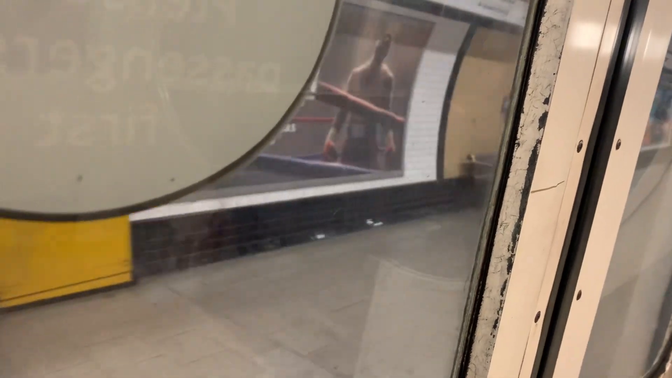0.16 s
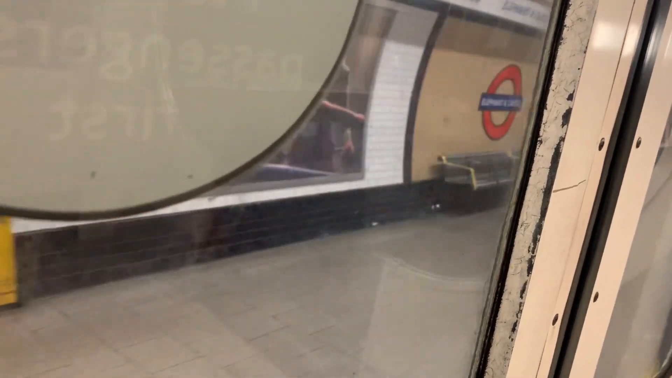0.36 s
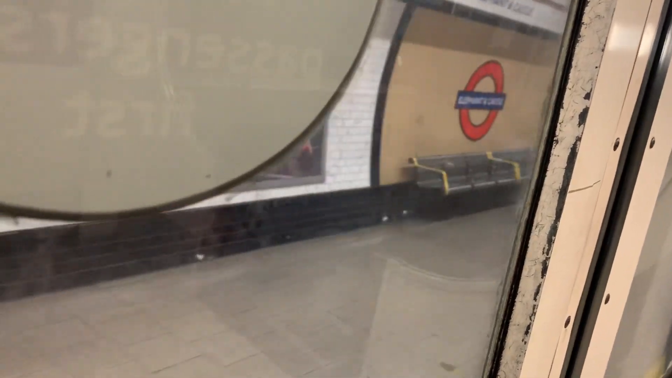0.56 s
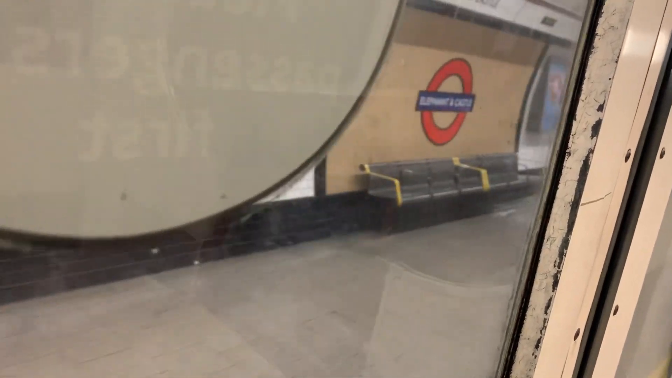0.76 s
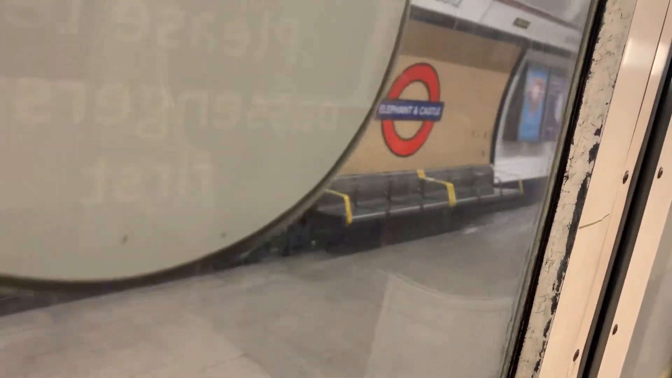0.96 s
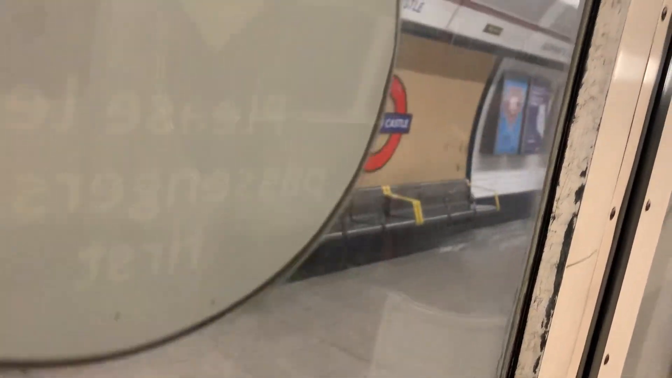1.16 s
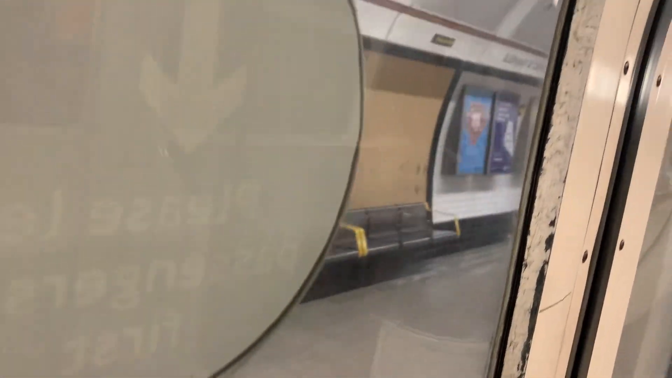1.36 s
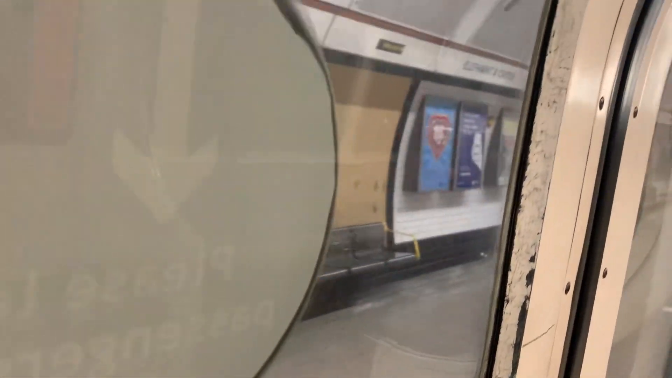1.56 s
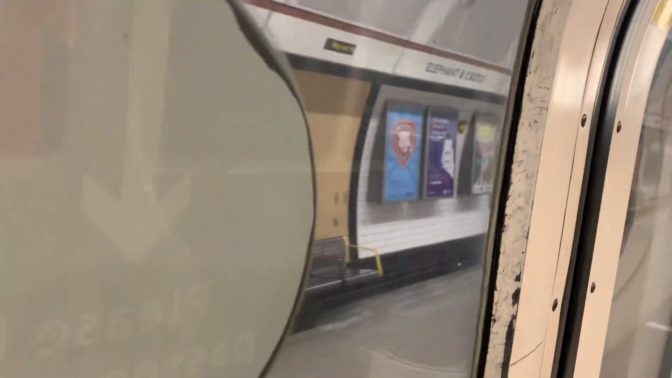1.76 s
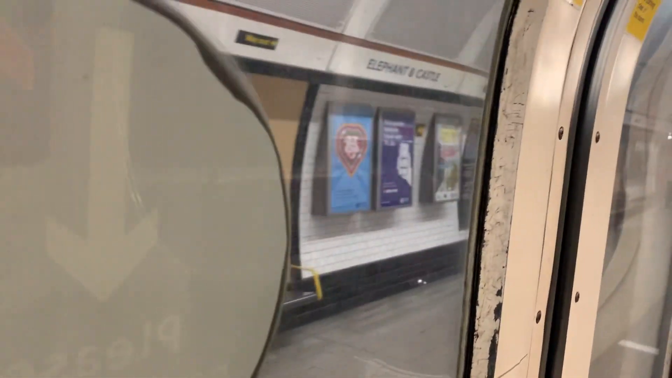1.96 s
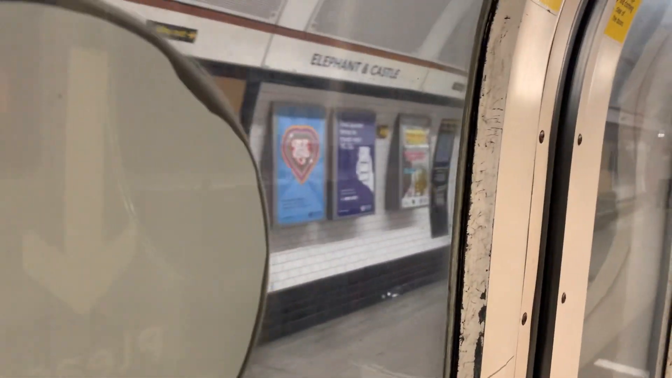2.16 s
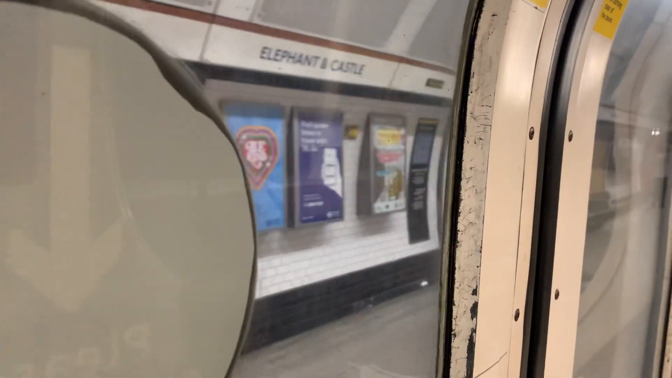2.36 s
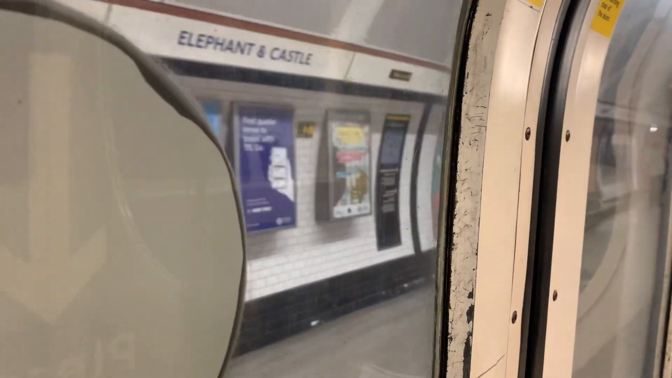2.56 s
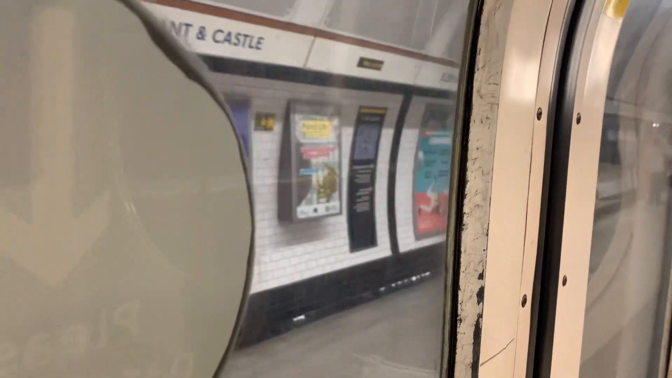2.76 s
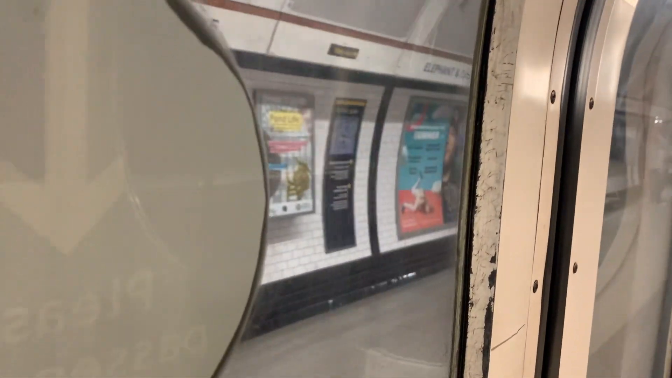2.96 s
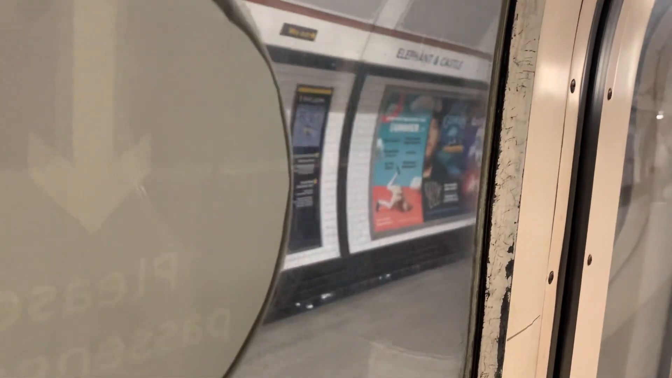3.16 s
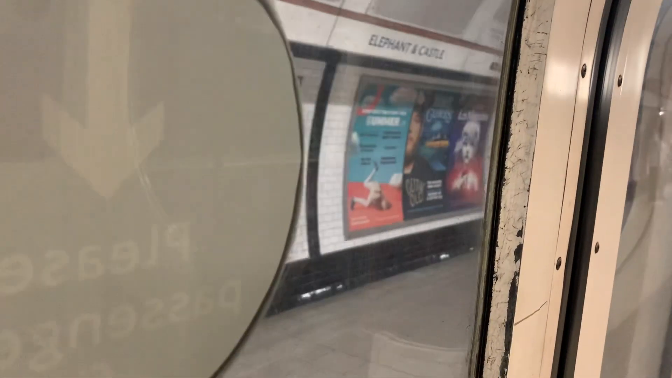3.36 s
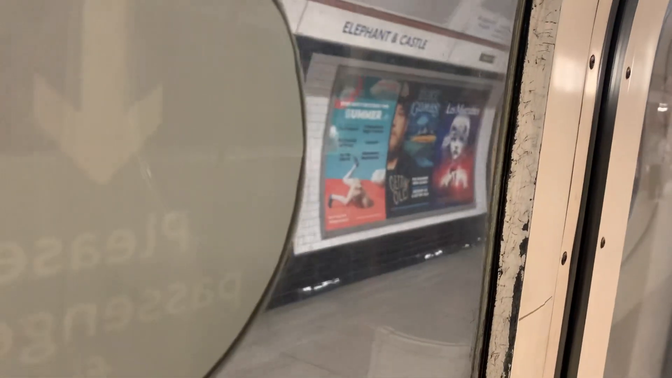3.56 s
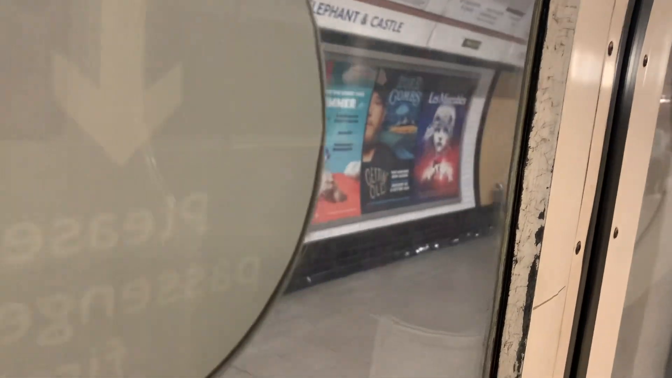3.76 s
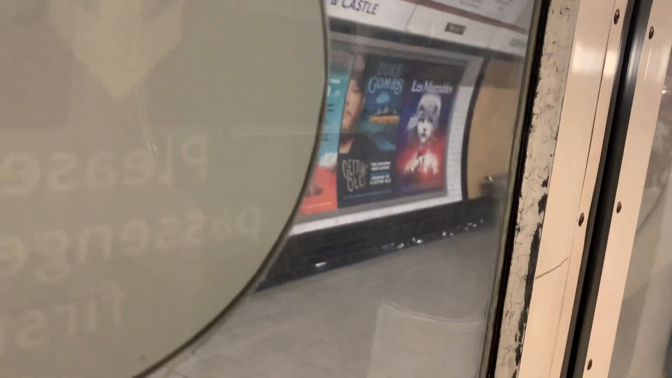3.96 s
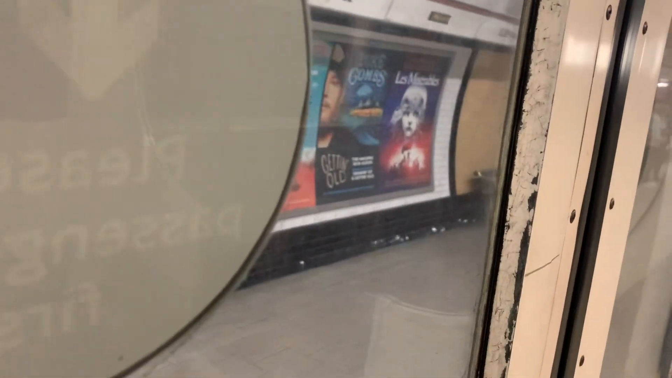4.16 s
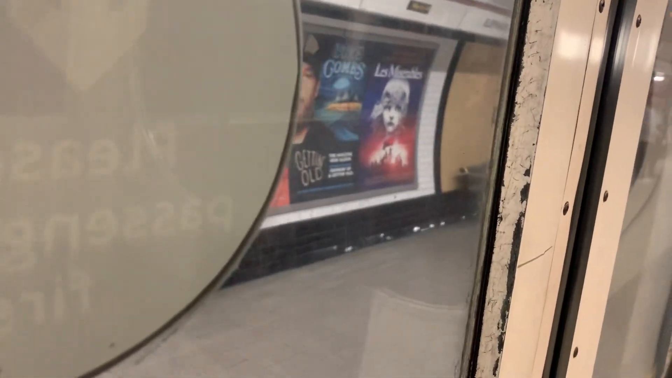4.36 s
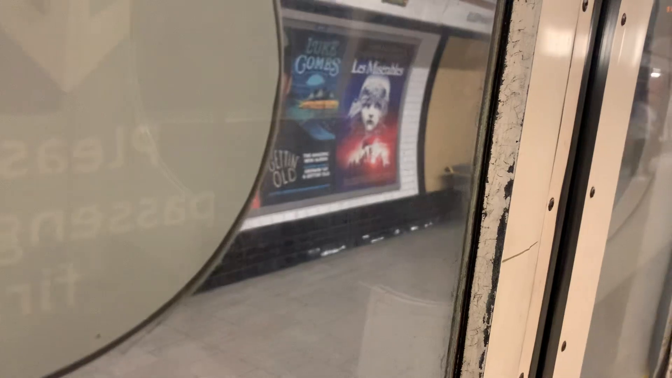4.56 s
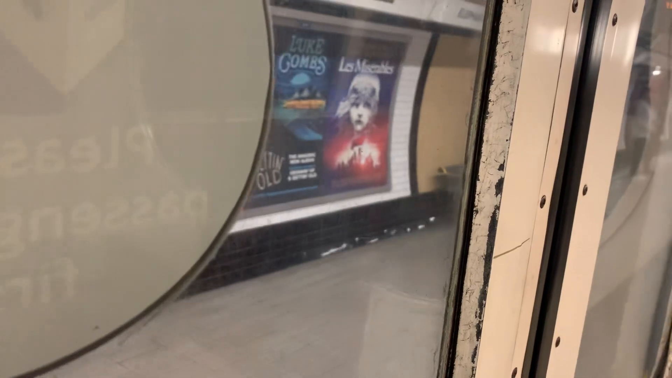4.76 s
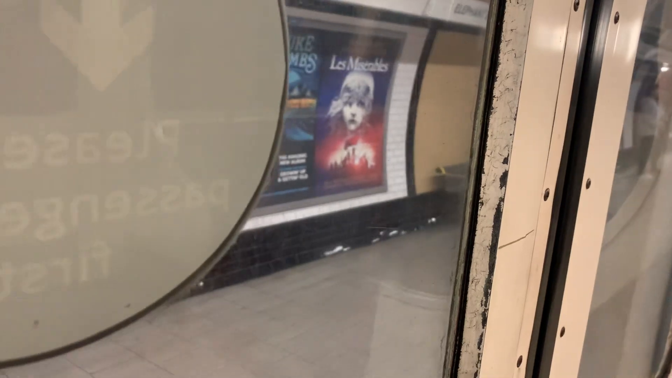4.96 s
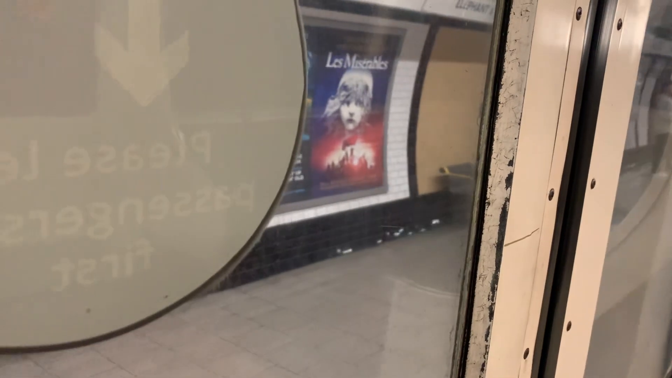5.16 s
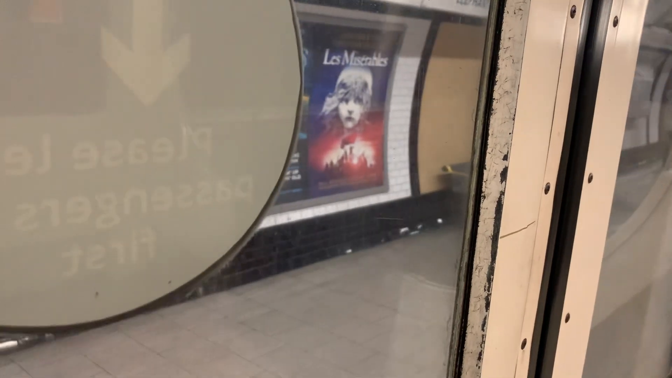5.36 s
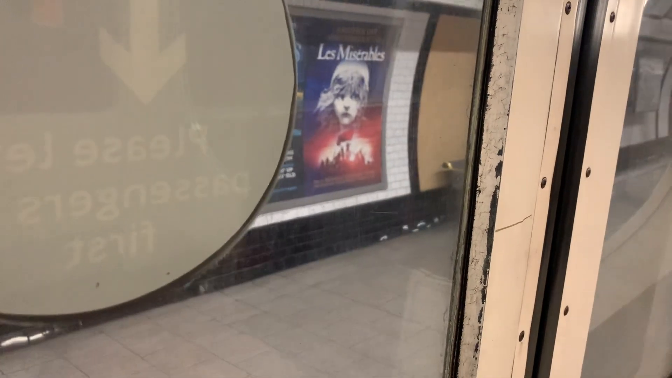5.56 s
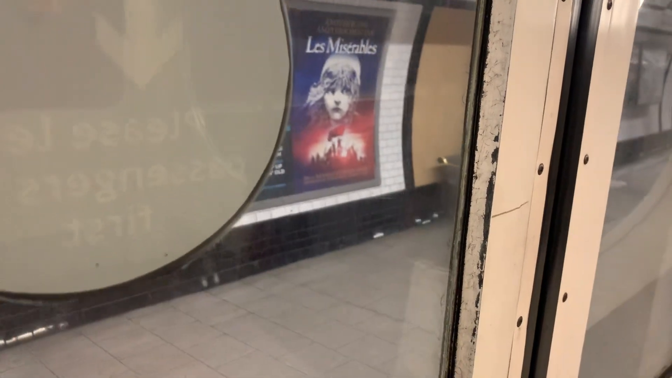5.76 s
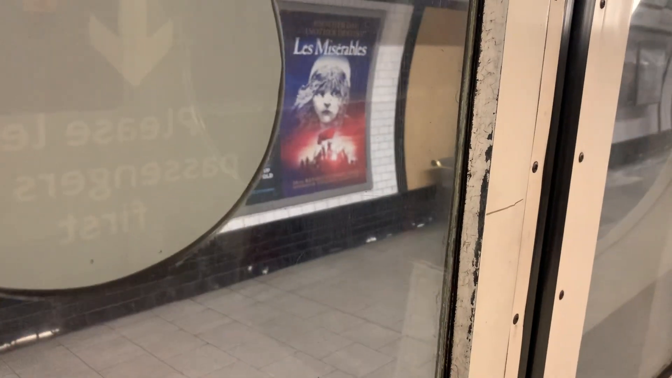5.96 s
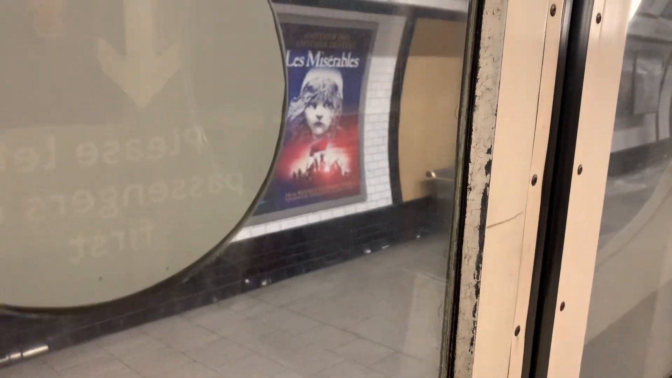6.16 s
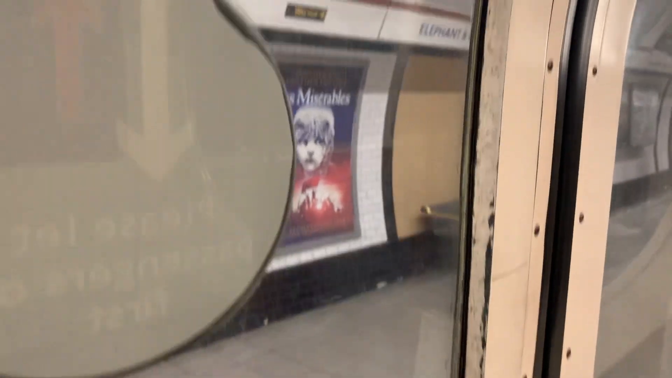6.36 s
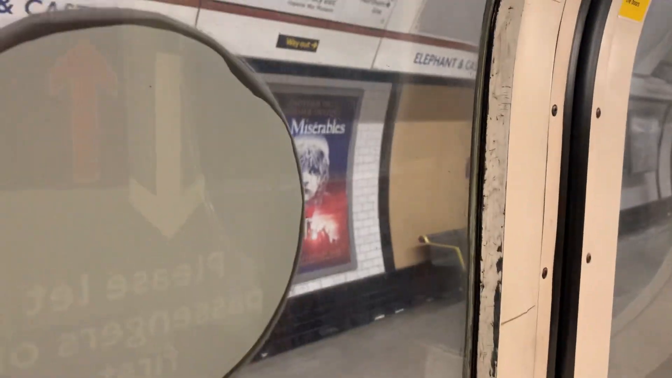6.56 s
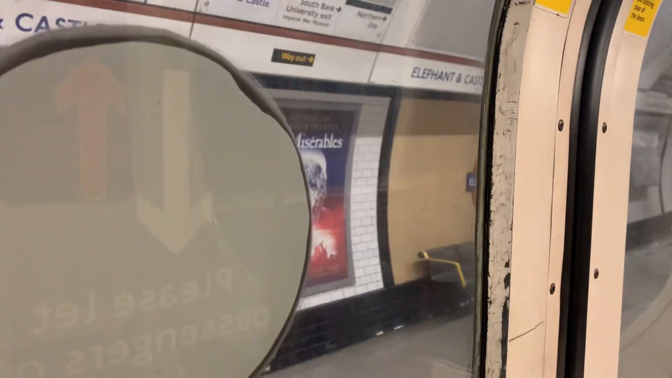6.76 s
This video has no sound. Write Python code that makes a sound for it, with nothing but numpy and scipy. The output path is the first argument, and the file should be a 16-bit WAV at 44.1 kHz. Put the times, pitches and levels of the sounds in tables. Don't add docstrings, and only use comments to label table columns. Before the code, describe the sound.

Heavy low drumming of a slowing underground train, heard from inside, with rail-joint thuds and air hiss fading to steady ventilation and a small puff.

```python
import sys
import numpy as np
from scipy import signal
from scipy.fft import rfft, irfft, next_fast_len
from scipy.io import wavfile
from scipy.ndimage import uniform_filter1d, map_coordinates

SR = 44100
rng = np.random.default_rng(int(sys.argv[2]) if len(sys.argv) > 2 else 0)


def ratio(d):
    e = np.asarray(d, float) / 20
    return 10 ** e


def master_out(mix):
    frames = np.transpose(np.atleast_2d(mix))
    ceiling = np.clip(frames, -1, 1)
    pcm = np.round(ceiling * 32767).astype(np.int16)
    wavfile.write(sys.argv[1], SR, pcm)


N = 300314
TIME_S = np.arange(N) / SR
DIRECT_ONLY = [[1], [0]]


def unit(x):
    return x / np.sqrt(np.mean(x ** 2) + 1e-20)


def along(points, hz):
    f, *cols = np.transpose(points)
    return [np.interp(np.log(hz + 1), np.log(f + 1), c) for c in cols]


def curves(rows):
    s, *cols = np.transpose(rows)
    return [np.interp(TIME_S, s, c) for c in cols]


def wobble(rate_hz):
    knots = rng.standard_normal(int(N * rate_hz / SR) + 4)
    return map_coordinates(knots, [np.arange(N) * rate_hz / SR])


def filtered(x, response):
    m = next_fast_len(N + 8192)
    return irfft(rfft(x, m) * response(np.fft.rfftfreq(m, 1 / SR)), m)[..., :N]


def modes(table, hz):
    power = 0
    for centre, width, db in table:
        detuning = (centre * centre - hz * hz) ** 2
        power = power + ratio(2 * db) * (hz * width) ** 4 / (detuning + (hz * width) ** 2) ** 2
    return np.sqrt(power)


def colour(points):
    return lambda hz: ratio(along(points, hz)[0]) * (hz < points[-1][0])


def rush(gain, patchy_db):
    z = signal.stft(rng.standard_normal((2, N + 1024)), nperseg=1024)[2]
    field = uniform_filter1d(rng.standard_normal(z.shape[1:]), size=3, axis=0)
    field = uniform_filter1d(field, size=5, axis=1)
    pair = signal.istft(z * ratio(patchy_db * unit(field)), nperseg=1024)[1][:, :N]
    return unit(filtered(pair, gain))


def steadied(x, share, span_s):
    span = int(span_s * SR)
    power = uniform_filter1d(uniform_filter1d(x ** 2, span), span)
    return unit(x / (np.abs(power) + .02) ** (np.clip(share, 0, 1) / 2))


def swell(peak_s, rise_s, fall_s):
    age = TIME_S - peak_s
    return np.exp(-(age / np.where(age < 0, rise_s, fall_s)) ** 2)


def strokes(rows, rise_s):
    s, db, fall = np.transpose(rows)[:, :, None]
    t = np.arange(0, N, 64) / SR
    bells = db * np.exp(-((t - s) / np.where(t < s, rise_s, fall)) ** 2)
    return np.interp(TIME_S, t, np.max(bells, axis=0))


# time_s, level_db
ROLLING_FORCE = [(0, -14.5), (.45, -19), (.95, -15), (1.15, -12), (1.55, -17.5), (1.85, -14.5), (2.35, -23),
                 (2.47, -18), (2.6, -21), (2.85, -16.5), (3.3, -30.5), (3.65, -19.5), (4.15, -24),
                 (4.45, -33), (4.7, -22), (4.95, -33.5), (5.5, -35), (6.81, -36.5)]


def speed():
    force_db, = curves(ROLLING_FORCE)
    full_speed_db = -14.5
    return force_db, uniform_filter1d(force_db, int(0.99 * SR), mode="nearest") - full_speed_db


def wheels():
    return boom() + ring() + drone() + jolt() + rattle()


# peak_s, boost_db
THUMPS = [(0.042, -8), (.12, -6), (.25, 5.5), (0.382, 0.5), (.53, 2), (0.641, 4.5), (.76, 0.5), (.9, -1.5),
          (1.12, -4.5), (1.23, -2.5), (1.38, 1.5), (1.63, -1), (1.71, -3), (1.799, 8.5), (1.87, 3.5),
          (2.0, -1), (2.13, 5), (2.21, 6), (2.289, 6.5), (2.371, 8.5), (2.54, -2), (3.15, 7.5), (2.74, -16),
          (3.0, 6), (3.301, 11.5), (3.46, 11.5), (3.58, 3), (3.718, 1.5), (3.9, 3), (4.1, 2), (4.27, 3),
          (4.62, 1.5), (4.73, -1.5), (4.92, 7), (5.1, 1), (5.35, 2), (5.62, 5), (5.76, 7), (5.86, 9),
          (6.2, 5), (6.55, 5)]


def thump_boost():
    return strokes([(s, db, 0.026) for s, db in THUMPS], rise_s=0.029)


# pitch_hz, width_hz, level_db
SHELL_MODES = [(33, 20, -45.5), (52.7, 11, -22.5), (66.6, 12, -6.5), (83, 20, -10), (100.5, 16, -7.5)]


def boom():
    level_db = speed()[0] - 6 + 1.11 * thump_boost()
    return ratio(level_db) * steadied(rush(lambda hz: modes(SHELL_MODES, hz), 2.5), share=.92, span_s=0.062)


# time_s, pitch_hz, level_db
SWAY = [(0.0, 81.7, -17.5), (0.75, 86.7, -18.5), (0.87, 98.4, -18), (1.02, 99, -17.5), (1.08, 88.5, -17),
        (2.02, 83.2, -18), (2.07, 76, -17), (2.29, 83.14, -15), (2.58, 71.46, -22.5), (2.79, 71.7, -21.5),
        (3.21, 90.2, -25), (3.29, 81.8, -26.5), (3.53, 94.25, -23.5), (3.66, 85.0, -20),
        (4.18, 82.2, -26.5), (4.36, 88.9, -31.5), (4.75, 80.1, -25.5), (4.8, 76, -45.5)]


def ring():
    hz, db = curves(SWAY)
    hz = uniform_filter1d(hz, size=2000, mode="nearest") + 3 * wobble(9)
    level_db = db - 4.5 + 0.56 * thump_boost() + 3.5 * wobble(9)
    return -2 * np.cos(2 * np.pi * np.cumsum(hz) / SR) * ratio(level_db) * DIRECT_ONLY


# peak_s, boost_db, fall_s, floor_boost_db
JOINTS = [(0, 3, 0.021, -23.5), (.16, 4, 0.13, 3), (0.671, 4, 0.08, 4), (0.891, 0.5, 0.14, 4),
          (1.125, 10, 0.11, -1.5), (1.305, 4.5, 0.05, 3), (1.382, 5.5, 0.087, 2.5), (1.62, 2, 0.13, 5),
          (1.845, 8, 0.049, 3), (1.92, 6.5, 0.16, 3), (2.7, -2, 0.043, 3), (3.0, 0.5, 0.042, -1.5),
          (3.45, 3, 0.014, -2), (3.77, 2, .07, -2), (5.38, 3, 0.041, 14), (5.8, 2.5, 0.13, -8),
          (6.7, 3.5, 0.037, 14)]
JOINT_RISE_S = 0.031


def joint_boost():
    return strokes([(s, db, fall) for s, db, fall, _ in JOINTS], JOINT_RISE_S)


# pitch_hz, width_hz, level_db
FLOOR_PANELS = [(133.8, 33, 1.5), (172, 25, -5)]


def drone():
    floor_db = strokes([(s, db, fall) for s, _, fall, db in JOINTS], JOINT_RISE_S)
    level_db = -21 + speed()[1] + floor_db + 0.96 * wobble(12)
    return ratio(level_db) * steadied(rush(lambda hz: modes(FLOOR_PANELS, hz), -0.5), share=0.29, span_s=0.4)


# pitch_hz, density_db (dB per Hz)
JOLT_COLOUR = [(175, -22.5), (232, 1), (250, 0.5), (310, 6), (425, 0), (445, 0), (540, -6), (600, -12),
               (1500, -41)]


def jolt():
    level_db = -29 + 0.34 * speed()[1] + joint_boost() + 1.56 * wobble(14)
    return ratio(level_db) * steadied(rush(colour(JOLT_COLOUR), 1.5), share=1.0, span_s=0.056)


# pitch_hz, density_db (dB per Hz)
RATTLE_COLOUR = [(400, -11), (560, -3.5), (700, 5), (900, 4.5), (1200, -3), (1500, -10), (2300, -10),
                 (2900, -16.5), (3600, -18), (6500, -37.5), (7100, -67)]


def rattle():
    level_db = -38 + 0.19 * speed()[1] + 0.92 * joint_boost() + 1.55 * wobble(25)
    return ratio(level_db) * rush(colour(RATTLE_COLOUR), 2.0)


# start_s, level_db
BLOWS = [(0.878, -23), (0.908, -18.5), (1.006, -14.5), (1.104, -7.5), (1.152, -10), (1.24, -7.5),
         (1.301, -3.5), (1.344, -7), (1.39, -13), (1.673, -10), (1.726, -13.5), (1.807, -19), (1.846, -11),
         (1.899, -10.5), (2.045, -13)]


def blows():
    s, db = np.transpose(BLOWS)[:, :, None]
    age = np.clip(np.arange(0, N, 16) / SR - s, 0, None)
    t60_s, rise_s = .09, .008
    decay = ratio(db - 5.5 - 60 * age / t60_s)
    stroke = np.sum(decay * (1 - np.exp(-age / rise_s)), axis=0)
    body = rush(colour(JOLT_COLOUR), 1.0) + ratio(-9) * rush(colour(RATTLE_COLOUR), 1.0)
    return np.repeat(stroke, 16)[:N] * body


# start_s, level_db, pitch_hz
THUDS = [
    (1.104, -4.5, 98),
    (1.153, -4, 113),
    (1.201, -11.5, 93),
    (1.303, -10.5, 175),
    (1.627, -12, 113),
    (1.994, 1.5, 101),
]


def thuds():
    total, t60_s, rise_s = 0, .1, .0033
    for s, db, hz in THUDS:
        age = np.clip(TIME_S - s, 0, None)
        envelope = ratio(db - 60 * age / t60_s) * (1 - np.exp(-age / rise_s))
        total = total - envelope * np.sin(2 * np.pi * hz * age)
    return total * DIRECT_ONLY


# pitch_hz, width_hz, level_db
PLATE_MODE = [(200.2, 24, 0)]
# peak_s, boost_db, fall_s
ROUGH_RAIL = [(.1, 9.5, 0.2), (.7, 10, 0.15), (1.05, 12, 0.19), (1.3, 15, 0.097), (1.55, 12, 0.3),
              (1.87, 9.5, 0.061), (2.3, 6, .06), (2.74, 10, .05), (3.4, -0.5, 0.086), (4.9, 4, 0.17),
              (5.85, 3.5, 0.27), (6.4, 6.5, 0.15)]


def plate():
    level_db = -34 + 0.6 * speed()[1] + strokes(ROUGH_RAIL, rise_s=0.17)
    return ratio(level_db) * steadied(rush(lambda hz: modes(PLATE_MODE, hz), 1.0), share=0.26, span_s=0.054)


# pitch_hz, width_hz, level_db
BODY_MODES = [(28, 12, -15), (51, 10, 9)]
# peak_s, boost_db, fall_s
LURCHES = [(.1, 4.5, .2), (.55, 9, 0.3), (1.05, 21.5, .2), (1.3, 12, .15), (1.55, 13, .2), (2.0, 5, .2),
           (2.5, 6, .2), (2.8, 6, 0.27), (3.15, 15, .15), (3.5, 6, .15), (4.25, 17.5, 0.23), (4.6, 5, .15),
           (4.95, 12, 0.14), (5.3, 9, .15), (5.6, 14, .2), (6.3, 5, .15)]


def lurches():
    level_db = -41 + 0.31 * speed()[1] + strokes(LURCHES, rise_s=.1)
    return ratio(level_db) * steadied(rush(lambda hz: modes(BODY_MODES, hz), 0.0), share=0.7, span_s=0.07)


# time_s, pitch_hz, level_db
GROAN = [
    (1.95, 136.8, -48),
    (2.05, 136.7, -26),
    (2.3, 133, -31),
    (2.4, 100.1, -53),
    (2.47, 76.4, -31),
    (2.62, 98, -17),
    (2.75, 129.2, -27.5),
    (3.1, 142.5, -29.5),
    (3.2, 141, -47.5),
]


def groan():
    hz, db = curves(GROAN)
    phase = 2 * np.pi * np.cumsum(hz + 2.5 * wobble(12)) / SR
    return 2 * ratio(db - 2.0 + 3 * wobble(9.8)) * np.sin(phase) * DIRECT_ONLY


# peak_s, pitch_hz, level_db, rise_s, fall_s
SQUEAKS = [(4.862, 4470, -53.5, .014, .016), (4.999, 4056, -40.5, .022, .011),
           (5.026, 4040, -51, .015, .015), (5.051, 4045, -47.5, .012, .012), (5.085, 4050, -54, .025, .025),
           (5.12, 4080, -56, .015, .012), (5.125, 4620, -60, .012, .015), (5.17, 3720, -56, .015, .015),
           (5.2, 3860, -53, .015, .015), (5.235, 3900, -56, .012, .015), (5.295, 3910, -54, .012, .015),
           (5.43, 4030, -55, .015, .03), (5.47, 4140, -57, .015, .015)]


def brake():
    tones = 0
    for s, hz, db, rise, fall in SQUEAKS:
        tones = tones + ratio(db) * swell(s, rise, fall) * np.sin(2 * np.pi * hz * TIME_S)
    return np.sqrt(2) * ratio(1.6 * wobble(70)) * tones * DIRECT_ONLY


# peak_s, boost_db, fall_s,
# top_boost_db
GUSTS = [(0.04, 5, 0.045, 7), (.12, 8, 0.11, 5), (.25, 6.5, 0.08, 9), (.82, -3, 0.024, 3),
         (1.1, 11, 0.18, 12), (1.27, 9, 0.12, 4.5), (1.64, 5, 0.35, 6), (1.82, 10.5, 0.16, 15),
         (1.92, 11, .12, 15), (2.17, 5.5, 0.15, 11), (2.5, 2, 0.1, 6), (2.72, 3.5, 0.043, 4),
         (3.2, 3, 0.0405, 9), (3.58, 4, .04, 6), (3.74, 11, 0.12, 19), (3.9, 5.5, .12, 7),
         (4.32, 2, 0.035, 4), (5.44, 5, 0.022, -2), (6.565, 7, 0.067, 12)]
# pitch_hz, density_db (dB per Hz)
HISS_COLOUR = [(1500, -26), (3000, -5), (5000, -11.5), (6850, -6), (6950, -43), (7480, -27), (7700, -7),
               (9200, -7.5), (11050, -9.5), (11150, -49)]
# pitch_hz, density_db (dB per Hz)
TOP_COLOUR = [(11950, -49), (12280, -26), (12420, 0), (12900, -3), (13600, -4), (14200, -6), (14800, -9),
              (15700, -15)]


def seals():
    speed_db = speed()[1]
    gust_db = strokes([(s, db, fall) for s, db, fall, _ in GUSTS], rise_s=0.022)
    top_gust_db = strokes([(s, db, fall) for s, _, fall, db in GUSTS], rise_s=0.022)
    hiss_db = -54.5 + 0.11 * speed_db + gust_db + 0.34 * wobble(21)
    top_db = -71.5 + .1 * speed_db + top_gust_db + 1.5 * wobble(15)
    hiss = ratio(hiss_db) * rush(colour(HISS_COLOUR), -2.5)
    return hiss + ratio(top_db) * rush(colour(TOP_COLOUR), 1.0)


# peak_s, level_db, rise_s, fall_s
PUFF = [
    (6.688, -43.5, .014, .06),
]
# pitch_hz, density_db (dB per Hz)
JET_COLOUR = [(2300, -36), (3300, 2), (4300, 5), (5100, 6), (5800, -3), (6500, -3), (7000, -54)]


def valve():
    s, db, rise, fall = PUFF[0]
    return ratio(db) * swell(s, rise, fall) * rush(colour(JET_COLOUR), 1.0)


# pitch_hz, density_db (dB per Hz)
AIR_COLOUR = [(20, -17), (45, -2.5), (110, -0.5), (170, -3), (330, -10.5), (500, -7), (820, -26),
              (1000, -18), (1300, -18), (2300, -23.5), (2900, -30), (3500, -29), (6600, -47), (7000, -40)]
# pitch_hz, width_hz, level_db
HUM_LINES = [(167, 11, -35.5), (238, 12, -41), (428.3, 16, -45), (635.5, 9, -48), (711, 12, -56),
             (930, 50, -50), (1035, 9, -50), (1060, 55, -47), (2312, 80, -57.5)]
# pitch_hz, width_hz, level_db
MOTOR_LINES = [(470.7, 10, -40.5), (948.5, 12, -48)]


def fans():
    air = ratio(-31.0 + 0.14 * wobble(3.5)) * rush(colour(AIR_COLOUR), 3.0)
    off_s, fade_s, drop_db = 5.02, .06, -7
    off = (1 + np.tanh((TIME_S - off_s) / fade_s)) / 2
    lines = hums(HUM_LINES) + ratio(drop_db * off) * hums(MOTOR_LINES)
    return filtered(air, cabin) + ratio(2.0 + 0.1 * speed()[1]) * lines


def hums(table):
    total = 0
    for centre, width, db in table:
        noise = rng.standard_normal((2, N))
        line = unit(filtered(noise, lambda hz: modes([(centre, width, 0)], hz)))
        total = total + ratio(db + 2.2 * wobble(11)) * steadied(line, share=.8, span_s=.2)
    return total


def cabin(hz):
    ripple = np.tanh(map_coordinates(rng.standard_normal(900), [hz / 28]))
    return ratio(1.7 * ripple * (hz > 500))


# pitch_hz, likeness (0-1), left_lead_rad (beyond the lag), left_minus_right_db
PORTS = [(30, .98, -.3, -2.6), (60, .993, -.4, -3.7), (110, .98, -.35, -4), (170, .96, 0, -3.5),
         (210, .7, .2, -2), (290, .8, -.1, -1), (350, .65, .5, -1), (480, .2, 1, -.5), (900, .7, 2.3, 0),
         (1350, .35, 1.8, 0), (1900, .35, 1.3, -1), (3200, .1, 0, -1), (5400, .3, 1.2, -1),
         (6500, .8, 0, 0), (9500, .87, .5, 0), (12500, .85, .7, -.5), (14000, .85, 1.4, -.5)]


def ports(hz):
    alike, lead, tilt_db = along(PORTS, hz)
    turn = np.arccos(np.clip(alike, 0, 1)) / 2
    lag_s = 10 / 44100
    left = ratio(tilt_db / 2) * np.exp(.5j * (lead - 2 * np.pi * hz * lag_s))
    return np.array([[np.cos(turn) * left, np.sin(turn) * left],
                     [np.cos(turn) / left, -np.sin(turn) / left]])


def scene():
    track = wheels() + blows() + thuds() + plate() + lurches()
    field = track + groan() + brake() + seals() + valve() + fans()
    return filtered(field[None], ports).sum(axis=1)


def band_limit(x):
    return signal.sosfilt(signal.butter(12, 15750, fs=SR, output="sos"), x)


def record(dry):
    rounded = dry / (1 + np.abs(dry / .92) ** 6) ** (1 / 6)
    return band_limit(rounded)


dry = scene()
out = record(dry)
master_out(out)
```